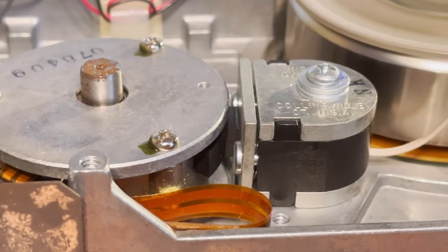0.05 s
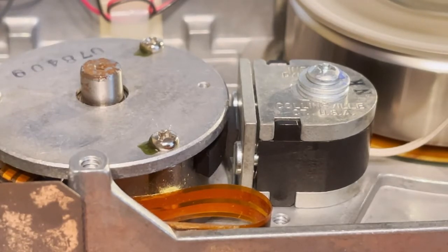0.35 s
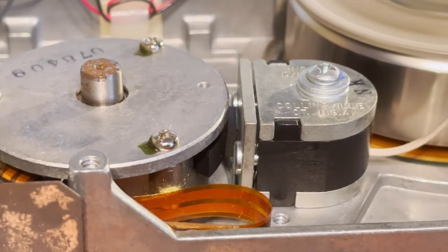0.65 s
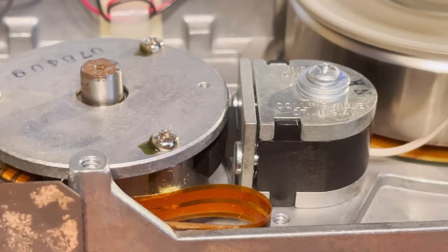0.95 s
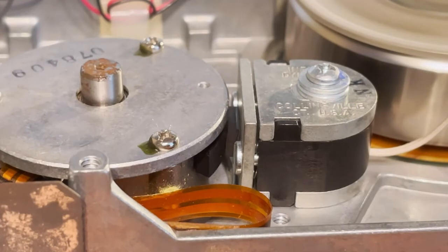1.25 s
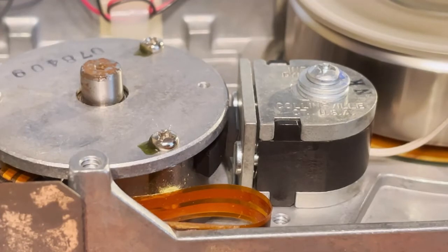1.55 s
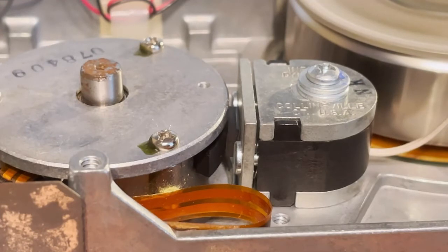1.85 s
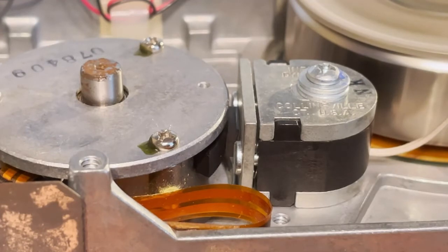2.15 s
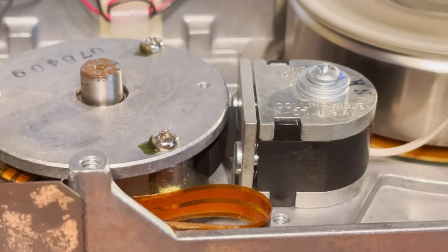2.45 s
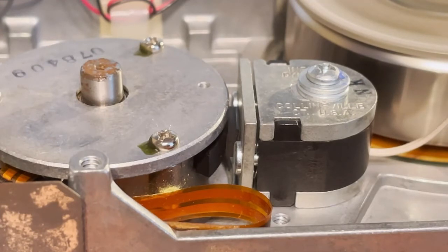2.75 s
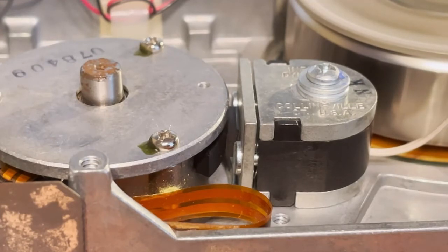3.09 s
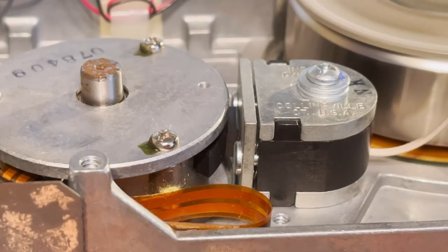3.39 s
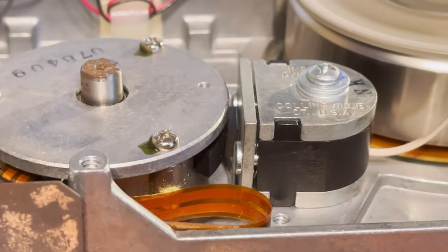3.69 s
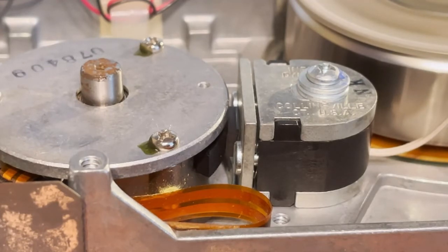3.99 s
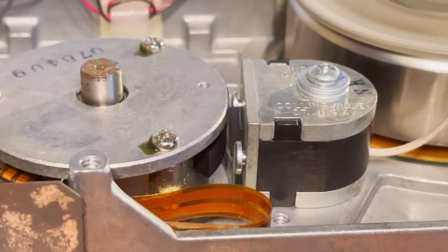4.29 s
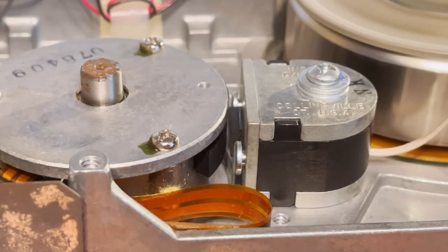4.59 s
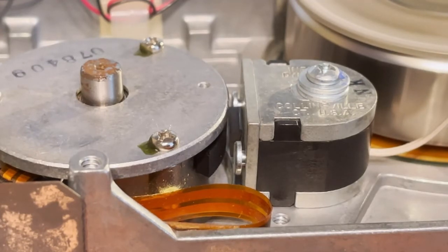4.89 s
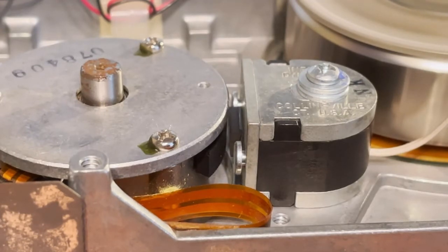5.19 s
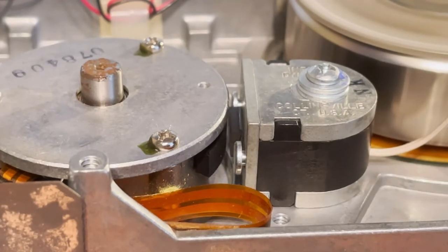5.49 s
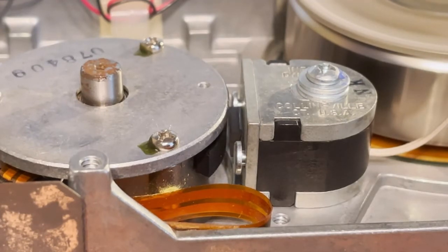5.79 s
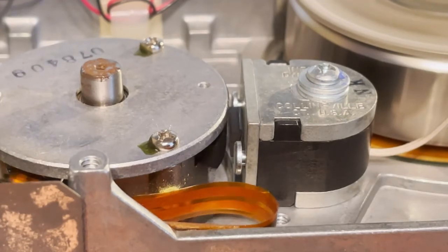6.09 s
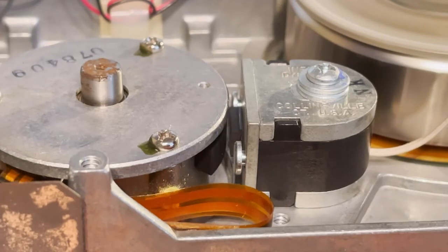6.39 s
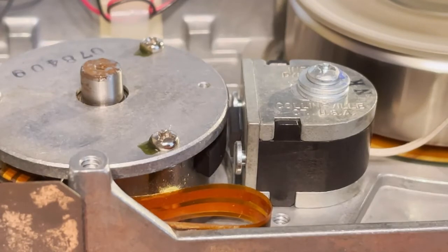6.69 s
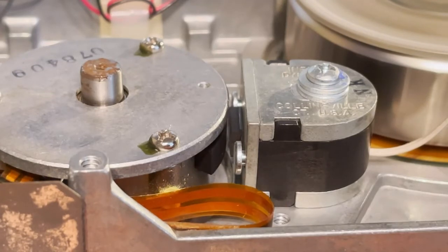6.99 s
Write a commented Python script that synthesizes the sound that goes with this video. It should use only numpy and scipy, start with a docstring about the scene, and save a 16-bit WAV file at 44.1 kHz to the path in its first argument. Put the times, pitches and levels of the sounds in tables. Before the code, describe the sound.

An open hard disk drive hums and whines steadily, with one sharp metal click, then faint short buzzes, a squeak and ticks.

```python
"""In a small room, an open hard disk drive spins close to a camera. Its motor hums, the disks stir
the air, and flaws in its two ball bearings make tones that beat (slowly swell and fade).
A steel latch snaps shut, and the camera's gain control turns the hum down for a moment.
Later the stepper motor twice drives the carriage of the read heads with a brief buzz.
Between these runs the carriage squeaks and the frame shudders; a few faint ticks sound too."""
import sys
import numpy as np
from scipy import signal
from scipy.fft import rfft, irfft, next_fast_len
from scipy.io import wavfile
from scipy.ndimage import uniform_filter1d, map_coordinates

SR = 44100
rng = np.random.default_rng(int(sys.argv[2]) if len(sys.argv) > 2 else 0)


def log_audio(samples):
    """Write samples as a 16-bit WAV file to the path given in sys.argv[1]."""
    # one column per channel
    frames = np.atleast_2d(samples).T
    # limit to full scale, then quantise
    limited = np.clip(frames, -1, 1)
    pcm = np.round(limited * 32767).astype(np.int16)
    wavfile.write(sys.argv[1], SR, pcm)


N = 310903

# tone colour of the carriage scraping along: f/Hz, level/dB
SCRAPE_COLOUR = [(1500, -15), (2400, -6), (3000, 1), (3300, 0), (3700, -9), (4500, -11), (5700, -24),
                 (6300, -21), (7000, -21), (12000, -28)]


def amp(db):
    """Turn decibels into a factor to multiply by."""
    return 10 ** (np.asarray(db) / 20)


def unit(x):
    """Scale a signal so that its average power is 1."""
    return x / np.sqrt(np.mean(x ** 2) + 1e-20)


def clock():
    """The time of every sample, in seconds."""
    return np.arange(N) / SR


def along(points, hz):
    """Read between the rows of a (frequency, value) table, on a logarithmic frequency scale."""
    freqs, values = np.transpose(points)
    return np.interp(np.log(hz + 1), np.log(freqs + 1), values)


def swell(points):
    """Turn a (time, level) table into a gain for every sample."""
    return amp(np.interp(clock(), *np.transpose(points)))


def wobble(rate):
    """A smooth curve through `rate` random values a second."""
    values = rng.standard_normal(int(N * rate / SR) + 4)
    steps = np.arange(0, N * rate / SR + 1, 1 / 10)
    return np.interp(clock() * rate, steps, map_coordinates(values, [steps]))


def filtered(x, response):
    """Change the strength and phase of each frequency in x by response(hz)."""
    size = next_fast_len(x.shape[-1] + SR // 4)
    hz = np.fft.rfftfreq(size, 1 / SR)
    return irfft(rfft(x, size) * response(hz), size)[..., :x.shape[-1]]


def noise(gain):
    """Noise whose strength at each frequency is gain(hz)."""
    return filtered(rng.standard_normal(N), gain) * np.sqrt(SR / 2)


def tone(progress, rate):
    """A pure tone of power 1 that swings `rate` times while progress grows by 1."""
    return np.sqrt(2) * np.cos(2 * np.pi * (rate * progress + rng.random()))


def motor(spin_time, shaft_hz=51.79, other_db=0.55, waver_db=0.5):
    """The motor hums on multiples of its speed, among other tones; each wavers a little in level."""
    # hum of the motor: multiple of the shaft speed, level/dB
    harmonics = [(1, -54), (8, -49.8), (16, -72.5), (24, -74)]
    # other steady tones of the running drive: f/Hz, level/dB
    other_tones = [(87.1, -60.5), (112.5, -65), (119.9, -69), (207.1, -68), (239.9, -72), (427.6, -67),
                   (450.5, -61.5), (563.2, -72), (1238.7, -70), (2245.5, -65), (2825.2, -68), (1334.6, -75),
                   (1455.5, -75), (1488.7, -77), (1507, -75), (1801.5, -76)]
    tones = [(k * shaft_hz, db) for k, db in harmonics]
    tones += [(hz, db + other_db) for hz, db in other_tones]
    return sum(amp(db + waver_db * wobble(1.63)) * tone(spin_time, hz) for hz, db in tones)


def flaw(spin_time, rate_hz, level_db, count, twin=None, size=4096):
    """A bump met rate_hz times a second makes harmonics; a slightly faster twin makes them beat."""
    k = np.arange(1, count + 1)
    harmonics = amp(level_db(k * rate_hz)) * np.exp(2j * np.pi * rng.random(count))
    cycle = np.fft.ifft(np.r_[0, harmonics], size) * size * np.sqrt(2)  # complex, so it can be shifted
    repeat = lambda turns: np.interp(turns % 1 * size, np.arange(size + 1), np.r_[cycle, cycle[0]])
    bumps = rate_hz * spin_time
    if twin is None:
        return repeat(bumps)
    faster_hz, quietest_s, share = twin
    twin_bumps = bumps + faster_hz * (spin_time - quietest_s)
    return (repeat(bumps) - share * repeat(twin_bumps)) / np.hypot(1, share)


def frame_gain(hz):
    """The cast metal frame resonates, which lifts faint tones near certain frequencies."""
    # resonances of the frame: f/Hz, width/Hz, level/dB
    resonances = [(2280, 150, 7.5), (3000, 120, -1), (3580, 140, 3.5), (3900, 130, 10.5), (4470, 100, 6),
                  (5080, 150, 9)]
    return amp(sum(db / (1 + (2 * (hz - centre) / width) ** 2) for centre, width, db in resonances))


def bearings(spin_time, pass_hz=198.0, oval_hz=337.85, ball_hz=171.15, cage_hz=18.8):
    """Balls pass a flaw in their track, an oval ball presses on it, and a flawed ball spins."""
    # harmonics of the track flaw, the oval ball and the ball flaw: f/Hz, level/dB
    track_levels = [(198, -97), (396, -58), (594, -56.5), (792, -70.5), (990, -72), (1188, -62.5),
                    (1386, -69.5), (1584, -59), (1783, -65), (2000, -81), (4500, -81)]
    oval_levels = [(338, -68.5), (676, -64), (1013, -89), (1351, -68.5), (1689, -75)]
    ball_levels = [(171, -70), (342, -66.5), (685, -60), (856, -77), (1027, -92), (1198, -66.5),
                   (1369, -64), (1883, -69), (2400, -78.5), (5000, -81.5)]
    # their twins (a second bearing or ball): extra rate/Hz, quietest t/s, share from 0 to 1
    track_twin = (0.1172, 0.48, 0.93)
    oval_twin = (0.34, 1.98, 0.5)
    ball_twin = (0.131, 3.88, 0.65)
    # a drone, a low whine and a whine come and go as the ball tumbles: multiple of ball_hz
    tumbling = [3, 8, 9]
    # their swells (the whine has one list before the latch and one after): t/s, level/dB
    drone = [(0.0, -51), (0.59, -49), (1.1, -52), (1.7, -59.5), (2.2, -52), (2.9, -50.5), (3.5, -56.5),
             (4.0, -71), (4.6, -56), (5.1, -56), (5.7, -59.5), (6.15, -69), (6.5, -59), (7.05, -54)]
    low_whine = [(0, -65), (1.2, -60), (1.5, -64), (2.5, -61), (2.95, -76), (3.4, -60), (3.65, -63),
                 (4.1, -55.5), (4.6, -67), (5.9, -67), (6.7, -63), (7.05, -74)]
    whine = [
        [(0.15, -59), (0.75, -75), (1.2, -56.5), (1.7, -61), (2.0, -60), (2.45, -68), (3.05, -65), (3.4, -61),
         (4.2, -64)],
        [(4.5, -56), (4.85, -60), (5.1, -55), (5.5, -58), (5.95, -51), (6.3, -56), (6.68, -48.5), (7.0, -56.5)],
    ]
    # side tones made by the ball cage, and the change for the upper ones: f/Hz, level/dB
    side_levels = [(171, -82), (400, -70), (1030, -78.5), (1370, -71.5), (1540, -62), (1750, -72),
                   (2200, -80), (2400, -65.5), (2570, -62.5), (2740, -76), (2900, -69.5), (3080, -70),
                   (3400, -87), (5130, -88.5)]
    upper_change = [(500, -0.5), (1550, -0.5), (2400, -9.5), (3000, -0.5)]
    # side tones that come and go, by (multiple of ball_hz, -1 below or 1 above): t/s, level/dB
    side_swells = { (9, -1): [(0, -74), (.3, -64), (.7, -77), (1.2, -71), (1.7, -62), (2.3, -66),
                   (2.8, -66), (3.35, -72), (3.9, -62), (5.4, -59), (6.1, -63), (6.6, -72), (7.05, -70)],
                   (9, 1): [(0, -57.5), (.8, -62.5), (1.35, -63), (1.55, -64), (1.95, -74), (2.3, -62),
                   (4.0, -64), (4.6, -67), (5.05, -75), (5.6, -63), (6.1, -72), (6.4, -75), (6.75, -63),
                   (7.05, -60)], (14, -1): [(0, -61), (1.5, -60), (3.2, -58.5), (5.2, -66), (7.05, -72)],
                   (15, -1): [(0, -60.5), (1.4, -61), (3, -65.5), (4, -75), (5.3, -65), (6.5, -62)], }

    def mute_db(multiples, hz):  # silences harmonics that get their own swell at the end
        return np.where(np.isin(np.rint(hz / ball_hz), multiples), -np.inf, 0)

    def side_db(hz, side):
        swelling = [k for k, its_side in side_swells if its_side == side]
        return along(side_levels, hz) + 20 * np.log10(frame_gain(hz)) + mute_db(swelling, hz)

    track = flaw(spin_time, pass_hz, lambda hz: along(track_levels, hz), count=23, twin=track_twin)
    oval = flaw(spin_time, oval_hz, lambda hz: along(oval_levels, hz), count=5, twin=oval_twin)
    ball_db = lambda hz: along(ball_levels, hz) + mute_db(tumbling, hz)
    ball = flaw(spin_time, ball_hz, ball_db, count=26, twin=ball_twin)
    # the circling cage carries the flawed ball in and out of the side that bears the load,
    # which adds a tone cage_hz below and above each harmonic
    cage = np.exp(2j * np.pi * cage_hz * spin_time)
    below = flaw(spin_time, ball_hz, lambda hz: side_db(hz, -1), count=28) * cage.conj()
    above = flaw(spin_time, ball_hz, lambda hz: side_db(hz, 1) + along(upper_change, hz), count=28) * cage
    out = np.real(track + oval + ball + below + above)
    for k, points, db in zip(tumbling, [drone, low_whine, np.vstack(whine)], [2.0, -0.4, -0.4]):
        out += amp(db) * swell(points) * tone(spin_time, k * ball_hz)
    for (k, side), points in side_swells.items():
        out += swell(points) * tone(spin_time, k * ball_hz + side * cage_hz)
    return out


def whistles(spin_time, pairs_db=1.0, twin_share=0.45, burst_hz=5114):
    """Thin metallic tones of the shaft each beat with a weaker twin; one more comes in bursts."""
    # the beating tones: f/Hz, level/dB, beat rate/Hz
    thin_tones = [(2073, -69.5, .3), (2126, -74.5, .5), (2227, -70, 1.9), (2293, -73.5, .7),
                  (2756, -72, .4), (3370, -79, .6), (3580, -76, 1.3), (3612, -75, .9), (3712, -76, 1.5),
                  (3747, -74, 2.3), (3912, -73, 5.1), (3919, -71, 2.7), (4037, -78, 2), (4437, -77, 3.1),
                  (4447, -76, 2.2), (4603, -80, 1.2), (4899, -79, .4), (5076, -80, .2), (5276, -83, .5)]
    # swell of the tone that comes in bursts: t/s, level/dB
    bursts = [(0, -80), (.3, -75), (.55, -80), (.9, -73), (1.45, -71), (1.8, -74), (3.4, -82), (3.9, -77),
              (5.5, -84), (6.3, -75), (7.05, -80)]
    pairs = sum(amp(db) * (tone(spin_time, hz) + twin_share * tone(spin_time, hz + beat_hz))
                for hz, db, beat_hz in thin_tones)
    return amp(pairs_db) * pairs / np.hypot(1, twin_share) + swell(bursts) * tone(spin_time, burst_hz)


def whir(spin_time, low_hz=300, high_hz=7400, count=700, scatter_db=9.0):
    """Rough bearing tracks add a crowd of faint tones of very uneven strength."""
    # tone colour of the whir: f/Hz, level/dB
    colour = [(300, -112), (550, -101), (750, -100), (900, -88), (1100, -96.5), (1400, -93.5),
              (1900, -96.5), (2400, -95.5), (3050, -93), (3400, -100), (4200, -102), (5400, -105),
              (7000, -107)]
    size = next_fast_len(N + SR)
    grid_hz = np.fft.rfftfreq(size, 1 / SR)
    spacing = (high_hz - low_hz) / count
    hz = low_hz + spacing * (np.arange(count) + rng.random(count))
    strength = amp(scatter_db * np.clip(rng.standard_normal(count), -2, 2))
    strength /= np.sqrt(uniform_filter1d(strength ** 2, size=15))  # even out each group of neighbours
    spectrum = np.zeros(len(grid_hz))
    spectrum[np.searchsorted(grid_hz, hz)] = strength * amp(along(colour, hz)) * frame_gain(hz)
    phases = np.exp(2j * np.pi * rng.random(len(grid_hz)))
    wave = irfft(spectrum * phases, size) * size * np.sqrt(spacing / 2)
    return map_coordinates(wave, [spin_time * SR], mode="wrap")  # all tones follow the shaft's speed


def air_and_hiss(flutter_db=1.0, top_hz=6000):
    """The disks drag air round in a fluttering rush, over the microphone's own hiss."""
    # tone colours of the air and of the hiss: f/Hz, level/dB
    air_colour = [(20, -97), (45, -77.5), (90, -80.5), (160, -82), (260, -90), (420, -82), (740, -94.5),
                  (930, -87), (1080, -96), (1550, -94.5), (2000, -96.5), (2450, -94), (3200, -101),
                  (3900, -103), (5600, -106)]
    hiss_colour = [(3000, -116), (6300, -106.5), (7600, -109), (9000, -108), (10500, -105.5),
                   (12100, -100.5), (13200, -105.5), (14300, -103), (15700, -108.5)]
    air = noise(lambda hz: amp(along(air_colour, hz)) / np.sqrt(1 + (hz / top_hz) ** 10))
    air *= amp(flutter_db * wobble(14))
    return air + noise(lambda hz: amp(along(hiss_colour, hz)))


def burst(t, t60):
    """A puff of noise in which no pitch stands out; t60 is the time it takes to fade by 60 dB."""
    spectrum = rfft(amp(-60 * t / t60) * rng.standard_normal(len(t)))
    strength = np.abs(spectrum)
    even = irfft(spectrum / strength, len(t)) * np.sqrt(np.mean(strength ** 2))
    return even * (t < t60)


def strikes(contacts, low_cut_hz, split_hz=11500, ring_db=-3.0, bright_db=2, vary_db=1.5):
    """Each contact cracks and rings the steel; a glancing one sounds thin, a soft one dull."""
    # ringing tones of the steel: f/Hz, level/dB, t60/s
    steel = [(1750, -18, .035), (2060, -14, .025), (2379, -20, .085), (2720, -16.5, .025), (3050, -21, .04),
             (3284, -29, .11), (3677, -19, .045), (3919, -16, .02), (4387, -11, .012), (5448, -27, .08),
             (6300, -8, .006), (6621, -36, .16), (7628, -37, .14)]
    # tone colour of the crack: f/Hz, level/dB
    crack_colour = [(500, 0), (900, 1), (1250, -3), (2000, 1), (3000, 2), (4400, 4), (5000, -7), (5850, -5),
                    (6350, 5), (7000, 3), (7600, 0), (9000, 2), (11000, -2), (12500, -3), (13700, 5),
                    (15400, 6), (16500, 0)]
    crack_gain = lambda hz: amp(along(crack_colour, hz))
    low_share = lambda hz: 1 / (1 + (hz / split_hz) ** 20)
    out, t = np.zeros(N + SR), np.arange(SR // 3) / SR
    for start, db, low_hz, high_hz in contacts:
        ring = np.zeros(len(t))
        for k, (ring_hz, level, t60) in enumerate(steel):
            fade = amp(level + rng.normal(0, vary_db) - 60 * t / t60)
            ring += (-1) ** k * fade * np.sin(2 * np.pi * ring_hz * t)
        # the part of the crack above split_hz dies first
        body = filtered(burst(t, t60=0.015), lambda hz: crack_gain(hz) * np.sqrt(low_share(hz)))
        bright = filtered(burst(t, t60=0.012), lambda hz: crack_gain(hz) * np.sqrt(1 - low_share(hz)))
        hit = amp(ring_db) * ring + body + amp(bright_db) * bright
        blow = filtered(hit, lambda hz: 1j * hz / (low_hz + 1j * hz) / (1 + (hz / high_hz) ** 4))
        out[round(start * SR):][:len(blow)] += amp(db) * blow
    low_cut = signal.butter(3, low_cut_hz, "highpass", fs=SR, output="sos")  # little bass reaches the air
    return signal.sosfilt(low_cut, out[:N])


def latch():
    """The steel latch snaps shut in a quick cluster of contacts."""
    # contacts of the latch: t/s, level/dB, lowest f/Hz, highest f/Hz
    contacts = [(4.2712, -24, 5000, 19000), (4.2736, 5.5, 12000, 30000), (4.2743, 6, 8000, 24000),
                (4.2759, 9, 2040, 14500), (4.2779, -5, 1200, 3800), (4.2793, -6, 3000, 10000),
                (4.2825, -1, 2000, 4500), (4.2862, -10, 1800, 4800), (4.289, -11, 2000, 5000)]
    return strikes(contacts, low_cut_hz=1440)


def frame_thuds(attack_s=0.0016):
    """Blows push the heavy frame into a brief low swing."""
    # swings of the frame: t/s, level/dB, f/Hz, t60/s
    thuds = [(4.277, -14, 135, 0.044), (4.281, -21, 94, .08), (4.276, -20, 286, 0.039),
             (4.275, -6, 460, 0.018), (4.276, -33, 680, 0.087), (4.276, -27, 910, 0.064),
             (6.445, -40, 77, 0.21)]
    out = np.zeros(N)
    for start, db, hz, t60 in thuds:
        t = np.maximum(clock() - start, 0)
        out += amp(db - 60 * t / t60) * np.sin(2 * np.pi * hz * t) * (1 - np.exp(-t / attack_s))
    return out


def room(x, build_s=0.0039):
    """The echo of a small room builds up, then each frequency dies at its own speed."""
    # how long the echo lasts: f/Hz, t60/s
    fade_times = [(200, 0.29), (1000, .26), (2500, 0.17), (4200, .17), (6500, 0.28), (9000, .28),
                  (12000, .22), (15000, 0.17)]
    # tone colour of the echo: f/Hz, level/dB
    colour = [(200, -3.5), (1000, 4), (1700, 5), (2600, 3), (5200, 1.5), (6400, -1.5), (7500, -3),
              (10000, -1.5), (13500, -2), (15500, -7)]
    freqs, t, spectra = signal.stft(rng.standard_normal(SR // 2), SR, nperseg=256)
    fade = amp(-60 * t / along(fade_times, freqs)[:, None])
    tail = signal.istft(spectra * fade * (1 - np.exp(-t / build_s)), SR, nperseg=256)[1]
    echo = signal.fftconvolve(x, tail / np.linalg.norm(tail))[:N]
    return filtered(echo, lambda hz: amp(along(colour, hz)))


def stepper(edge_s=0.008, scrape_db=-7, uneven_db=2.5, fade_db_per_s=60):
    """The stepper motor buzzes at a slightly rising rate and fades, while the carriage scrapes along."""
    # runs of the motor: start t/s, end t/s, start rate/Hz, end rate/Hz, level/dB
    runs = [(5.953, 6.072, 164.6, 166.5, -54), (6.897, 7.05, 164.6, 166.8, -55)]
    # harmonics of the buzz: multiple of the step rate, level/dB
    harmonics = [(14, -11), (15, -10), (16, -8), (17, -8), (18, -3), (19, -8), (20, 2), (21, -12),
                 (22, -10), (27, -15), (29, -19), (38, -18)]
    out, t = np.zeros(N), clock()
    scrape = unit(noise(lambda hz: amp(along(SCRAPE_COLOUR, hz))))
    for start, end, from_hz, to_hz, db in runs:
        steps = np.cumsum(np.interp(t, [start, end], [from_hz, to_hz])) / SR
        uneven = amp(uneven_db * wobble(from_hz))
        buzz = uneven * sum(amp(level) * tone(steps, k) for k, level in harmonics)
        rasp = scrape * (1 + 0.5 * np.cos(2 * np.pi * steps))  # each step jerks the carriage
        fade = amp(-fade_db_per_s * np.maximum(t - start, 0))
        running = np.clip(np.minimum(t - start, end - t) / edge_s, 0, 1)
        out += amp(db) * running * (fade * buzz + amp(scrape_db) * rasp)
    return out


def carriage_squeak(edge_s=0.0062, third_harmonic_db=-14, pitch_jitter=0.0037, flicker_db=2.2):
    """Sliding metal scrapes, and sings a short gliding note as it sticks and slips."""
    # slides: start t/s, end t/s, start f/Hz, end f/Hz, squeak level/dB, scrape level/dB
    slides = [(6.083, 6.097, 3780, 4300, -55, -59), (6.095, 6.181, 4290, 4440, -47.5, -60),
              (6.172, 6.193, 2910, 2890, -52, -52), (6.188, 6.21, 3080, 3050, -58, -56)]
    out = np.zeros(N)
    scrape = unit(noise(lambda hz: amp(along(SCRAPE_COLOUR, hz))))
    waver = 1 + pitch_jitter * wobble(200)
    grip = amp(flicker_db * wobble(90))
    for start, end, from_hz, to_hz, squeak_db, scrape_db in slides:
        i = np.arange(round(start * SR), min(round(end * SR), N))
        sliding = np.clip(np.minimum(i / SR - start, end - i / SR) / edge_s, 0, 1)
        phase = 2 * np.pi * np.cumsum(np.linspace(from_hz, to_hz, len(i)) * waver[i]) / SR
        squeak = np.sqrt(2) * (np.sin(phase) + amp(third_harmonic_db) * np.sin(3 * phase))
        out[i] += sliding * grip[i] * (amp(squeak_db) * squeak + amp(scrape_db) * scrape[i])
    return out


def carriage_ticks():
    """Light knocks of the carriage make the steel tick."""
    # knocks: t/s, level/dB, lowest f/Hz, highest f/Hz
    knocks = [(6.1774, -35, 2500, 4000), (6.3829, -25, 600, 2200), (6.392, -30, 500, 2200),
              (6.404, -28, 150, 1200), (6.435, -34, 150, 900), (7.034, -34, 2500, 4200)]
    return strikes(knocks, low_cut_hz=260)


def shudder(start_s=6.385, attack_s=0.011, t60=0.67, level_db=-47, low_hz=60, top_hz=230):
    """The frame shudders with a rough low bump after the carriage stops."""
    t = np.maximum(clock() - start_s, 0)
    rumble = unit(noise(lambda hz: hz / np.hypot(hz, low_hz) / (1 + (hz / top_hz) ** 4)))
    return amp(level_db - 60 * t / t60) * (1 - np.exp(-t / attack_s)) * rumble


def scene(speed_jitter=0.00013, room_db=-15, air_spread_db=-18, echo_spread_db=-24, treble_hz=3000):
    """The drive as two closely spaced microphone openings hear it, left and right."""
    # how far the left side leads the right: f/Hz, phase/radians
    left_lead = [(30, -0.2), (200, 0.39), (410, 0.05), (540, 0.27), (700, 1), (1200, 0.03), (4900, 0.73),
                 (5800, 0.6), (6800, -1.8), (7500, -1.7), (8650, -3.2), (10000, -4.5), (11500, -5),
                 (12300, -5.5), (12800, -6.5)]
    # time as the shaft counts it: its speed is almost, but not quite, constant
    spin_time = clock() + np.cumsum(speed_jitter * wobble(7.2)) / SR
    moves = latch() + carriage_ticks() + frame_thuds() + shudder() + stepper() + carriage_squeak()
    spinning = motor(spin_time) + bearings(spin_time) + whistles(spin_time) + whir(spin_time)
    left = spinning + air_and_hiss() + moves + amp(room_db) * room(moves)
    right = filtered(left, lambda hz: np.exp(-1j * along(left_lead, hz)))
    # a little noise and echo treble differ between the two sides
    spread = amp(air_spread_db) * air_and_hiss()
    spread += amp(echo_spread_db) * filtered(room(moves), lambda hz: 1j * hz / (treble_hz + 1j * hz))
    return np.array([amp(-0.06) * left + spread, amp(-0.16) * right - spread])


def record(dry, limit_db=-10, recovery_db_per_s=85, top_hz=15850):
    """Gain control turns loud sound down at once, then recovers; treble above top_hz is cut off."""
    power = np.abs(uniform_filter1d(np.mean(dry ** 2, axis=0), size=44))  # averaged over about 1 ms
    excess_db = np.maximum(10 * np.log10(power + 1e-12) - limit_db, 0)
    recovery_db = recovery_db_per_s * clock()
    cut_db = np.maximum.accumulate(excess_db + recovery_db) - recovery_db
    return filtered(dry * amp(-cut_db), lambda hz: (1 - np.tanh((hz - top_hz) / 130)) / 2)


dry = scene()
out = record(dry)
log_audio(out)
```